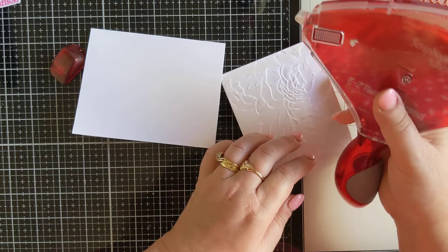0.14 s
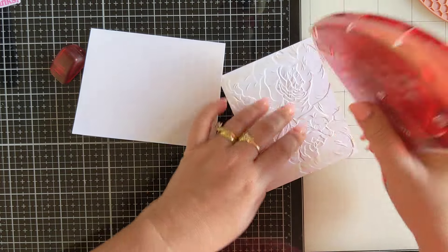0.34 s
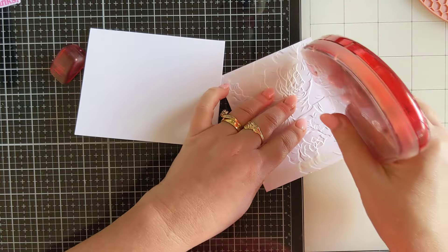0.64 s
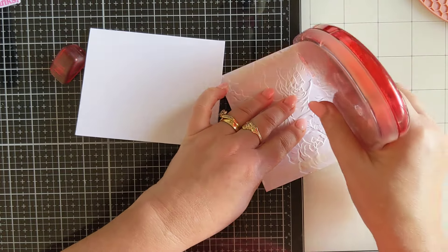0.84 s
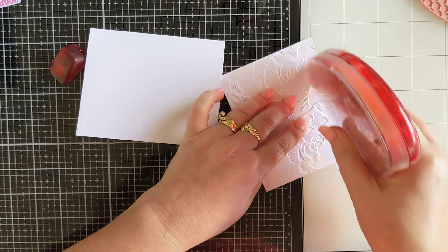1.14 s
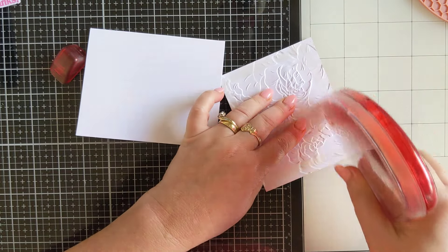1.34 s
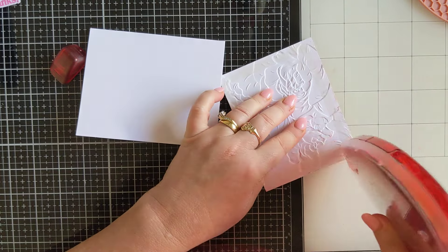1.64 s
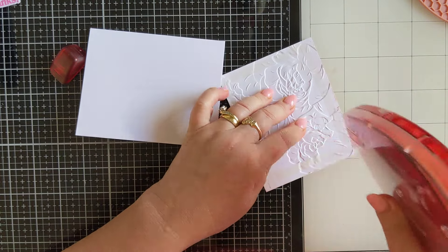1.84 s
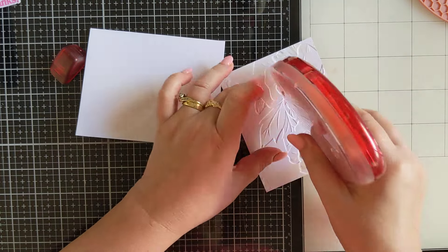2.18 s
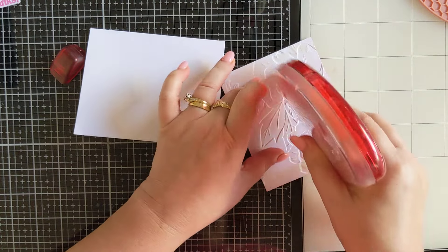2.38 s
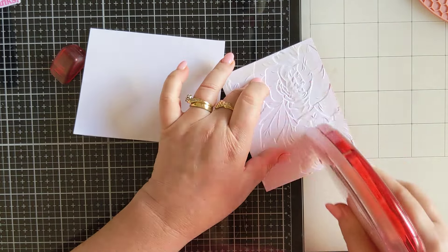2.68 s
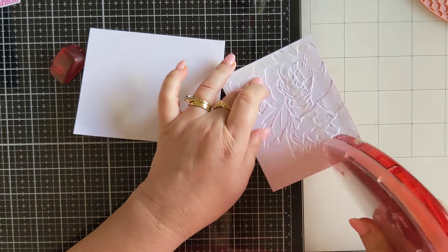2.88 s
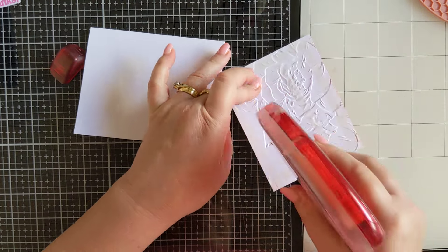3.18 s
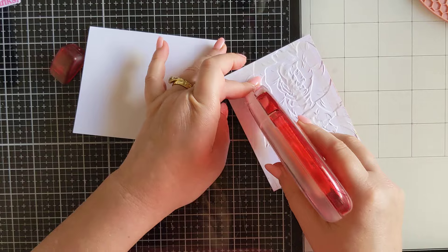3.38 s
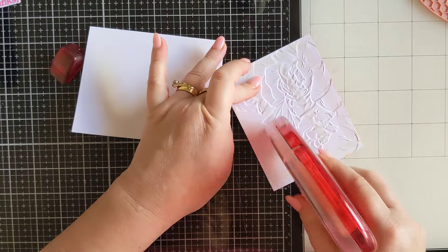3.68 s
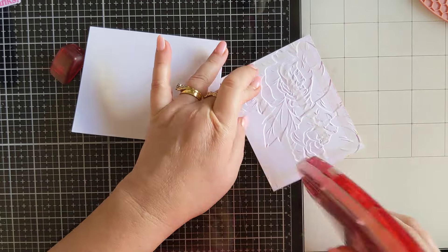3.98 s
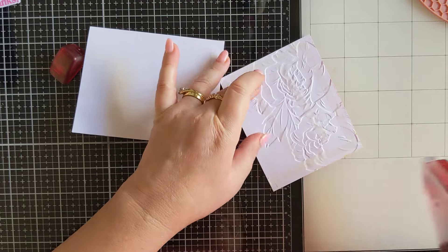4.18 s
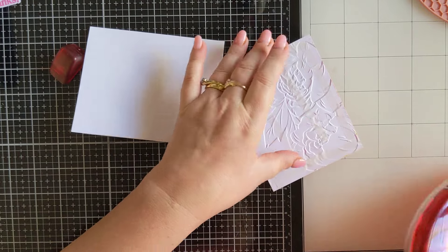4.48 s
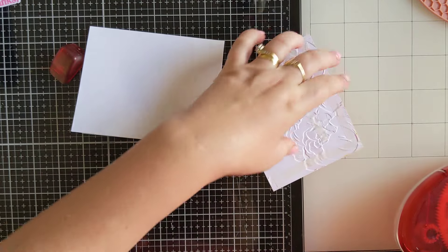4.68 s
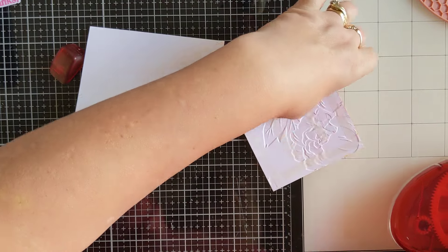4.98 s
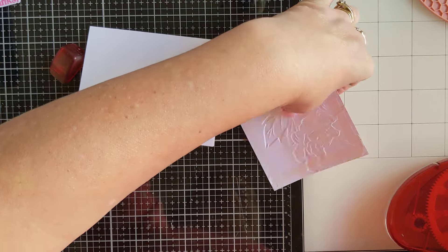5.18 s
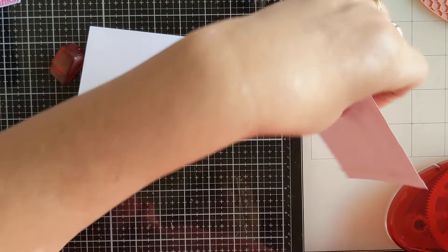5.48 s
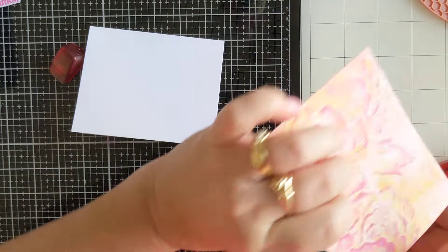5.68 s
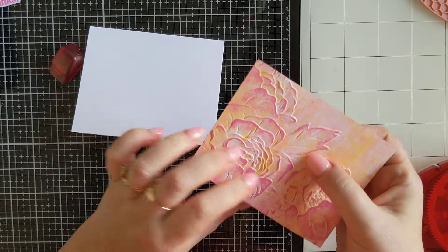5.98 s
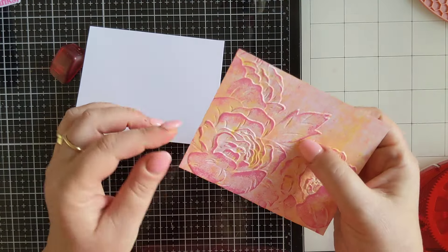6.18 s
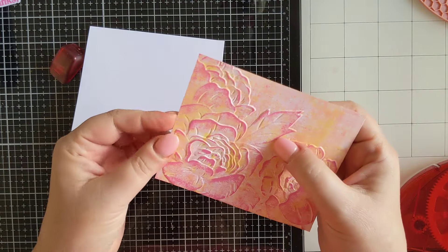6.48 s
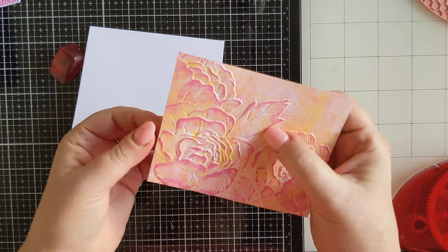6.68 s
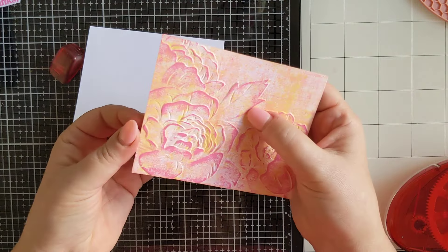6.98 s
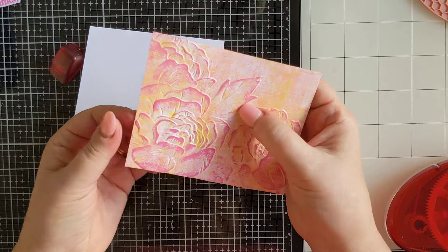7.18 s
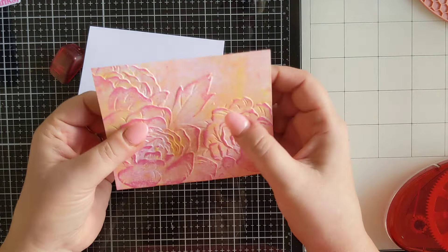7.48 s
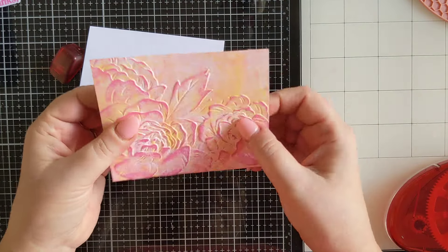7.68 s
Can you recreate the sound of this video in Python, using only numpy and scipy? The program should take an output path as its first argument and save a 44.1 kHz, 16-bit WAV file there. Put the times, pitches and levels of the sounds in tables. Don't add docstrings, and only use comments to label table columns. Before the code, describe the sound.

Three quick toothed ticking strokes with sticky film crackle, a hard plastic set-down, then papery flicks and small taps in a quietly humming room.

```python
import sys
import numpy as np
from scipy import signal
from scipy.fft import rfft, irfft, next_fast_len
from scipy.io import wavfile
from scipy.ndimage import uniform_filter1d

SR = 44100
rng = np.random.default_rng(int(sys.argv[2]) if len(sys.argv) > 2 else 0)


def master_out(mix):
    frames = np.transpose(np.atleast_2d(mix))
    ceiling = np.clip(frames, -1, 1)
    pcm = np.round(ceiling * 32767).astype(np.int16)
    wavfile.write(sys.argv[1], SR, pcm)


def natural_amplitude(level_db):
    exponent = np.asarray(level_db, float) / 20
    return 10 ** exponent


N = 345744

# (pitch [Hz], level [dB per Hz])
AIR_NOISE = [(14, 0), (21, 7), (28, -2), (36, 0), (50, -6), (82, -11),
             (125, -5), (170, -1), (250, -11), (310, -12), (450, -9), (900, -22), (1400, -31.5), (2300, -36),
       (3300, -32), (16000, -37)]
AIR_DB = -67.5
# (pitch [Hz], level [dB rms], waver [Hz])
HUM = [(100.34, -54, 0.48), (201, -64, 1.2), (300.8, -64.5, 20.5), (400.3, -72, 11)]

# (time [s], peak [dB], ring [Hz], brightness [dB])
SNAPS = [(0.2496, -52.5, 3400, 0), (0.8899, -38.5, 4140, -0.5), (1.8544, -58, 4370, -7),
         (2.1764, -67, 4000, 20.5), (2.3141, -41, 3360, -1.5), (3.0403, -40, 3560, 4),
         (3.465, -53.5, 1630, -10), (4.0518, -37.5, 1660, -3), (4.2526, -43.5, 1405, 2),
         (4.4568, -36, 4100, -2.5), (4.9594, -45, 2780, -1), (5.2162, -51, 1730, -15),
         (5.3882, -50.5, 1690, 12.5), (5.8602, -60, 1560, -9), (5.8995, -43.5, 2110, -9),
         (5.9622, -42, 2150, -17), (6.7082, -49.5, 1650, -9), (7.4785, -33.5, 3180, -3),
         (7.538, -41, 2360, -10), (7.5438, -34.5, 3020, -2.5), (7.7737, -34, 3980, -7),
         (7.801, -33.5, 3100, -4.5)]
# (time [s], peak [dB], ring [Hz], brightness [dB])
TINKS = [(0.5416, -59, 3270, 6), (0.5523, -34.5, 3680, -5), (0.5605, -42, 3820, 3),
         (0.8432, -54, 2600, -21), (1.943, -47.5, 4450, 5), (1.9714, -46.5, 4000, 6),
         (2.0057, -47.5, 4050, 12.5), (2.2745, -40, 4400, 1), (2.9985, -39, 2120, 3),
         (3.027, -35, 3340, 1.5), (4.0876, -32, 3520, 4.5), (4.346, -49, 5500, 12),
         (4.4808, -29.5, 1670, 1), (4.7502, -40, 3150, -17.5), (4.9016, -35, 3900, 3),
         (5.1772, -47.5, 1680, -27), (5.3428, -50.5, 1700, 3), (5.3637, -64, 1540, -8),
         (5.3725, -50, 1440, -31), (5.688, -56.5, 3540, 14.5), (5.9088, -33.5, 2060, -24.5),
         (5.948, -29, 2300, -10), (6.7396, -54.5, 3300, 5), (6.8388, -50, 1720, -5),
         (7.2074, -47.5, 1720, 5), (7.3226, -52, 1960, -9), (7.334, -46.5, 1740, -28),
         (7.8074, -42, 3070, 10)]
SNAP_KNOCK_DB, SNAP_FIZZ_DB, SNAP_RING = -7, -6, 0.15
TINK_KNOCK_DB, TINK_FIZZ_DB, TINK_RING = -20, -12, 0.5
KNOCK_PER_DB, FIZZ_PER_DB = -0.73, 1.1442
KNOCK_HZ, BODY_HZ, FIZZ_HZ = (380, 1250), (1400, 8000), (7000, 16000)
RING_T60_S, RING_SLOPE = 0.02, 1.34
CRACK_FROM = 0.59
BODY_TOP_HZ, TOP_OCTAVES_PER_DB = 6360, 0.01
CLICK_NEAR_DB, CLICK_ROOM_DB = -6, -11

# (time [s], ratchet teeth passed [count])
TRAVEL = [
    [(1.090, 0), (1.1455, 1), (1.231, 3), (1.3365, 6), (1.401, 8), (1.518, 12), (1.585, 14), (1.678, 16),
     (1.730, 17)],
    [(2.454, 0), (2.483, 1), (2.523, 2), (2.585, 4), (2.660, 7), (2.710, 9), (2.789, 12), (2.823, 13),
     (2.874, 14)],
    [(3.628, 0), (3.671, 1), (3.704, 2), (3.734, 3), (3.7845, 5), (3.8305, 7), (3.882, 9), (3.937, 11),
     (3.974, 12)],
]
# (tooth [dB], film peel [dB], roller drone [dB], desk rumble [dB], drone pitch [Hz])
STROKE = [
    (-22.5, -36.5, -47.5, -53, 489),
    (-25, -34, -46.5, -50, 463),
    (-23.5, -37, -49.5, -52, 407),
]
NORMAL_TEETH_PER_S, HAND_SMOOTH_S = 35, 0.12
LIFT_S, LIFT_DB_PER_S = 0.006, -600
PEEL_DB, DRONE_DB, RUMBLE_DB, TOOTH_DB = 4, 9.5, 18, 0
DRONE_SAG = 0.036
TOOTH_SPREAD_DB = 0.8
REBOUND_S, REBOUND_DB, REBOUND_SPREAD_DB = 0.014, -16.5, 7
# (pitch [Hz], level [dB per Hz])
SHELL = [(200, -47), (900, -17.5), (1700, -17), (2800, -20.5), (3300, -9), (4000, -10.5), (4350, 2),
         (4800, 0), (5300, 4), (6600, -10.5), (8600, -13), (11000, -17.5), (13000, -4.5), (14800, -1.5)]
# (pitch [Hz], width [Hz], level [dB])
SHELL_RINGS = [(3530, 450, -19.5), (7640, 300, -12), (9490, 1170, 0)]
# (pitch [Hz], width [Hz], level [dB])
ROLLER = [(620, 50, -8), (830, 80, -14), (1000, 60, -5)]
DESK_HZ, DESK_WIDTH_HZ = 62, 9

# (start [s], length [s], crackle [dB], brightness [dB])
RUSTLE = [(2.306, 0.2, -52, -7), (4.453, 0.096, -31, -1), (4.523, 0.1, -31.5, -3), (4.6, 0.082, -38, 1),
          (4.896, 0.13, -45, 1), (5.127, 0.091, -54, 5), (5.23, 0.21, -57, -2), (5.914, 0.033, -41, 9.5),
          (5.94, 0.043, -32.5, 5.5), (7.202, 0.03, -49, -6.5), (7.331, 0.032, -48, -5),
          (7.545, 0.045, -48, 17), (7.77, 0.085, -40, 3)]
RUSTLE_RISE_S, RUSTLE_FADE_DB = 0.0017, -15.5
RUSTLE_LOW_DB, RUSTLE_FIZZ_DB = -5, -7
LOW_PER_DB, HISS_PER_DB = -0.48, 0.87

# each event list is (time [s], peak [dB]);
# each list of ringing tones is (pitch [Hz], level [dB], time to fade by 60 dB [s])
TAP = [(2.315, -46)]
TAP_MODES = [(436, -2, 0.085), (897, 4, 0.088), (950, -21, .05), (1500, -6, 0.031)]
THUMPS = [(2.33, -50)]
THUMP_MODES = [(62, 2, .3)]
LAY_DOWN = [(4.514, -19)]
LAY_MODES = [(112, -1.5, 0.29), (624, 4, 0.067), (1010, -13, 0.015), (1756, 2, 0.038), (2210, 1.5, 0.062),
             (2900, 16, 0.012), (3780, 6, 0.018), (4100, -6, 0.062)]
FLAP = [(5.388, -20.5)]
FLAP_MODES = [(163, -9.5, 0.63), (205, -27, .1), (340, 4.5, 0.33), (448, 1, 0.065), (490, 9.5, 0.065),
              (590, 11, 0.028), (760, 4.5, 0.03), (996, 5.5, 0.035), (1142, 1, 0.08), (1670, -5, 0.02)]
FLICK = [
    (5.954, -32.5),
    (7.799, -40.5),
]
FLICK_MODES = [(318, -9, .04), (490, 17, 0.023), (613, 6, 0.12), (810, -9, 0.04)]

# (start [s], length [s], pitch [Hz], level [dB rms])
SQUEAKS = [(4.837, 0.051, 4240, -65), (4.934, 0.22, 4650, -71), (5.618, 0.17, 5460, -73),
           (5.67, 0.12, 3640, -74), (5.736, 0.34, 3120, -78), (5.743, .15, 6290, -72),
           (6.92, .2, 4340, -77)]
SQUEAK_SAG, SQUEAK_WIDTH_HZ, SQUEAK_DB = 0.015, 45, -8

# (pitch [Hz], time to fade by 60 dB [s])
ROOM = [(250, 0.26), (700, 0.3), (1800, 0.35), (4600, 0.38), (12000, 0.29)]
# (delay [s], level [dB])
ECHOES = [(.0025, -10), (.0075, -5), (.012, -7), (0.016, -19.5)]

# (pitch [Hz], level [dB])
MIC = [(4000, 1), (5000, -2.5), (5700, 4.5), (6200, -1.5), (6700, -4), (7600, 0), (8500, -3), (11000, -2.5),
       (13000, -5), (15000, -1), (15700, -6), (15950, -55)]
# (pitch [Hz], likeness [0-1])
SAME = [(30, .998), (100, 1), (300, 0.99), (700, 0.98), (1400, 0.13), (3000, 0.064), (8000, 0.028)]
# (pitch [Hz], level [dB])
LOUDER_LEFT = [(40, 5.5), (130, 0.5), (290, 4), (640, 5.5), (1410, 5.5), (3100, 7.5), (6820, 8),
               (15000, 10)]
# (pitch [Hz], phase [radians])
LEFT_LEADS = [(25, -.2), (100, -.58), (200, -1.), (340, -1.9), (650, -1.4), (1400, -.3), (4000, -.3)]


def evened(x):
    return x / np.sqrt(np.mean(x ** 2) + 1e-20)


def peaked(x):
    return x / abs(x).max()


def read(points, hz):
    f, value = np.transpose(points)
    return np.interp(np.log(hz + 1), np.log(f + 1), value)


def add(mix, s, sound):
    part = mix[..., round(s * SR):][..., :sound.shape[-1]]
    part += sound[..., :part.shape[-1]]


def band(x, lo_hz, hi_hz):
    edges = [lo_hz, min(hi_hz, SR / 2 - 1)]
    return signal.sosfilt(signal.butter(2, edges, "bandpass", fs=SR, output="sos"), x)


def resonate(x, hz, width):
    turn = np.exp(2j * np.pi * np.cumsum(hz * np.ones(x.shape[-1])) / SR)
    r = np.exp(-np.pi * width / SR)
    return 2 * (turn * signal.lfilter([1 - r], [1, -r], x / turn)).real


def causal(points):
    level_db = read(points, abs(np.fft.fftfreq(4096, 1 / SR)))
    gain = np.log(natural_amplitude(np.maximum(level_db, -60)))
    return np.fft.ifft(np.exp(np.conj(signal.hilbert(gain)))).real[:1024]


def crackle(per_s, spread_db):
    happens = rng.random(N) < per_s / SR
    size = natural_amplitude(spread_db * np.minimum(rng.exponential(1, N), 3)) * happens
    return evened(size * rng.choice([-1, 1], (2, N)))


def puff(t60, length=1024):
    t = np.arange(length) / SR
    x = rng.standard_normal((2, length)) * natural_amplitude(-60 * t / t60) * (1 - np.exp(-t / 0.00029))
    z = rfft(x)
    return irfft(z / abs(z), length) * natural_amplitude(-20 * t / t60)


def air():
    frames, hz = N // 1024 + 5, np.fft.rfftfreq(4096, 1 / SR)
    a, b, c, d, patches = rng.standard_normal((frames, 2049, 5)).T
    patches = evened(uniform_filter1d(uniform_filter1d(patches, 60, 0), 4, 1))
    level_db = read(AIR_NOISE, hz)[:, None] + 1.53 * patches
    z = np.array([a + 1j * b, c + 1j * d]) * natural_amplitude(level_db)
    x = signal.istft(z, nperseg=4096, noverlap=3072)[1][:, :N]
    return natural_amplitude(AIR_DB) * x / np.std(band(x, 544, 16000))


def hum():
    t, out = np.arange(N) / SR, np.zeros(N)
    for hz, db, waver_hz in HUM:
        fuzz = evened(resonate(rng.standard_normal(N), hz, waver_hz))
        steady = np.sqrt(2) * np.sin(2 * np.pi * (hz * t + rng.random()))
        share = np.clip(waver_hz / 14, 0, 1)
        out += natural_amplitude(db) * (np.sqrt(1 - share) * steady + np.sqrt(share) * fuzz)
    return out


def clicks(events, knock_db, fizz_db, ring_share):
    out, t = np.zeros((2, N)), np.arange(1024) / SR
    for s, db, hz, bright_db in events:
        burst = puff(0.0066)
        ring = np.sin(2 * np.pi * hz * t) * natural_amplitude(-60 * t / RING_T60_S * (hz / 1700) ** RING_SLOPE)
        low_hz = np.clip(CRACK_FROM * hz, 900, 2200)
        top_hz = np.clip(BODY_TOP_HZ * 2 ** (TOP_OCTAVES_PER_DB * bright_db), 2500, 12000)
        crack = peaked(band(burst, low_hz, top_hz))
        knock = peaked(band(burst, *KNOCK_HZ))
        fizz = peaked(band(puff(0.044), *FIZZ_HZ))
        click = ring_share * ring + (1 - ring_share) * crack
        click = click + natural_amplitude(knock_db + KNOCK_PER_DB * bright_db) * knock
        click = click + natural_amplitude(fizz_db + FIZZ_PER_DB * bright_db) * fizz
        add(out, s, natural_amplitude(db + 4) * click)
    return out


def pull():
    t, out, teeth = np.arange(N) / SR, np.full((4, N), -120.), []
    for rows, (tooth_db, peel_db, drone_db, rumble_db, hz) in zip(TRAVEL, STROKE):
        s, passed = np.transpose(rows)
        on = (t >= s[0]) & (t < s[-1] + 0.15)
        now = t[on]
        speed = np.gradient(np.interp(np.minimum(now, s[-1] - 1e-3), s, passed)) * SR
        speed = np.where(now < s[-1] - 2e-3, speed, 1 / (s[-1] - s[-2]))
        smooth_speed = uniform_filter1d(speed, round(HAND_SMOOTH_S * SR), mode="nearest")
        doublings = np.log2(smooth_speed / NORMAL_TEETH_PER_S)
        lift_db = LIFT_DB_PER_S * np.maximum(now - s[-1] - LIFT_S, 0)
        speed_db = np.c_[[PEEL_DB, DRONE_DB, RUMBLE_DB]] * doublings
        out[:3, on] = np.c_[[peel_db, drone_db, rumble_db]] + speed_db + lift_db
        out[3, on] = hz * (1 - DRONE_SAG * doublings)
        drops = np.interp(np.arange(passed[-1] + 1), passed, s)
        drop_db = tooth_db + TOOTH_DB * np.interp(drops, now, doublings)
        a, b, c = rng.standard_normal((len(drops), 3)).T
        teeth += zip(drops, drop_db + TOOTH_SPREAD_DB * a)
        rebound_db = drop_db + REBOUND_DB + REBOUND_SPREAD_DB * c
        teeth += zip(drops + REBOUND_S * (1 + 0.15 * b), rebound_db)
    return (*out, teeth)


def tooth():
    t = np.arange(600) / SR
    x = rng.standard_normal((2, 600)) * (t / 0.0014) * np.exp(1 - t / 0.0013)
    return 7.93 * x / np.linalg.norm(x, axis=1, keepdims=True)


def runner():
    peel_db, drone_db, rumble_db, drone_hz, teeth = pull()
    drive = natural_amplitude(peel_db - 5.5) * crackle(5000, spread_db=6.5)
    for s, db in teeth:
        add(drive, s, natural_amplitude(db - 3.5) * tooth())

    shell = causal(SHELL)
    t = np.arange(len(shell)) / SR
    rings = np.zeros(len(shell))
    for hz, width, db in SHELL_RINGS:
        rings += natural_amplitude(db - 23.5) * np.exp(-np.pi * width * t) * np.sin(2 * np.pi * hz * t)
    housing = signal.oaconvolve(drive, shell[None], axes=1)
    housing = housing + signal.oaconvolve(drive[::-1], rings[None], axes=1)
    housing = housing[:, :N] / np.linalg.norm(shell)

    bumps = band(crackle(400, spread_db=1.5), 392, 963)
    modes = resonate(bumps, np.maximum(drone_hz, 400), 73)
    for hz, width, db in ROLLER:
        modes = modes + natural_amplitude(db) * resonate(bumps, hz, width)
    drone = evened(modes + natural_amplitude(-19) * bumps)

    shake = resonate(rng.standard_normal(N), DESK_HZ, DESK_WIDTH_HZ)
    rumble = evened(resonate(shake, DESK_HZ, 2 * DESK_WIDTH_HZ))
    rumble = natural_amplitude(uniform_filter1d(rumble_db, 2500) - 7) * rumble
    return housing + natural_amplitude(drone_db - 6.5) * drone, rumble


def rustle():
    t, level_db, bright_db = np.arange(N) / SR, np.full(N, -120.), np.zeros(N)
    for s, length, db, brightness_db in RUSTLE:
        on = (t >= s) & (t < s + length)
        age = t[on] - s
        rise = np.maximum(1 - age / RUSTLE_RISE_S, 0) / 2
        level_db[on] = db + RUSTLE_FADE_DB * (age / length + rise)
        bright_db[on] = brightness_db
    low_db = RUSTLE_LOW_DB + LOW_PER_DB * bright_db
    fizz_db = RUSTLE_FIZZ_DB + HISS_PER_DB * bright_db
    snaps = crackle(800, spread_db=1.5)
    body, low, fizz = (evened(band(snaps, *edges)) for edges in (BODY_HZ, KNOCK_HZ, FIZZ_HZ))
    return natural_amplitude(level_db - 14) * (body + natural_amplitude(low_db) * low + natural_amplitude(fizz_db) * fizz)


def blow(events, modes, crack_db):
    out, t = np.zeros((2, N)), np.arange(9000) / SR
    rings = sum(natural_amplitude(db - 60 * t / t60) * np.sin(2 * np.pi * hz * t) for hz, db, t60 in modes)
    for s, db in events:
        add(out, s + 0.000722, natural_amplitude(db) * peaked(rings))
        add(out, s, natural_amplitude(db + crack_db) * band(puff(0.051), 350, 4500))
    return out


def squeaks():
    out = np.zeros(N)
    for s, length, hz, db in SQUEAKS:
        u = np.linspace(0, 1, round(length * SR))
        noise = rng.standard_normal(SR // 2)[:len(u)]
        tone = resonate(noise, hz * (1 - SQUEAK_SAG * u), SQUEAK_WIDTH_HZ)
        add(out, s, natural_amplitude(db + SQUEAK_DB) * np.sin(np.pi * u ** 0.49) * evened(tone))
    return out


def room(x, tail_db=2.0):
    out = x.copy()
    for s, db in ECHOES:
        add(out, s, natural_amplitude(db) * x)
    turn = 2 * np.pi * 7.3 * np.arange(N) / SR
    for k in range(3):
        taps = np.zeros((2, SR // 2))
        at = np.arange(320, SR // 2 - 16, 16) + rng.integers(0, 16, (2, (SR // 2 - 321) // 16))
        np.put_along_axis(taps, at, rng.choice([-1., 1.], at.shape), 1)
        hz, t, z = signal.stft(taps, SR, nperseg=256)
        fade = natural_amplitude(-60 * t / read(ROOM, hz)[:, None])
        tail = signal.istft(z * fade, SR, nperseg=256)[1]
        tail = tail / np.linalg.norm(tail[0])
        share = np.sqrt(2 / 3) * np.cos(turn + k * np.pi / 3)
        out += natural_amplitude(tail_db) * signal.fftconvolve(x * share, tail, axes=1)[:, :N]
    return out


def scene():
    noise = air() + hum()
    small = clicks(SNAPS, SNAP_KNOCK_DB, SNAP_FIZZ_DB, SNAP_RING)
    small = small + clicks(TINKS, TINK_KNOCK_DB, TINK_FIZZ_DB, TINK_RING)
    tool, rumble = runner()
    blows = blow(TAP, TAP_MODES, 2.5) + blow(LAY_DOWN, LAY_MODES, 19.9)
    blows = blows + blow(FLAP, FLAP_MODES, 7.5) + blow(FLICK, FLICK_MODES, 6)
    near = natural_amplitude(CLICK_NEAR_DB) * small + natural_amplitude(-14) * blows + blow(THUMPS, THUMP_MODES, -30)
    sent = tool + rustle() + squeaks() + natural_amplitude(CLICK_ROOM_DB) * small + natural_amplitude(-3) * blows
    return near + room(sent) + rumble + noise


def low_pass(x):
    return signal.sosfilt(signal.butter(12, 16850, fs=SR, output="sos"), x)


def record(dry):
    size = next_fast_len(N)
    hz = np.fft.rfftfreq(size, 1 / SR)
    left, other = rfft(dry, size) * natural_amplitude(read(MIC, hz))
    same = np.clip(read(SAME, hz), 0, 1)
    right = same * left + np.sqrt(1 - same ** 2) * other
    right = right * np.exp(-1j * read(LEFT_LEADS, hz))
    lean_db = read(LOUDER_LEFT, hz) / 2
    ports = irfft(np.array([left * natural_amplitude(lean_db), right * natural_amplitude(-lean_db)]), size)[:, :N]
    return low_pass(ports)


dry = scene()
out = record(dry)
master_out(out)
```